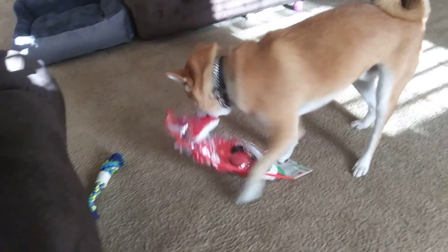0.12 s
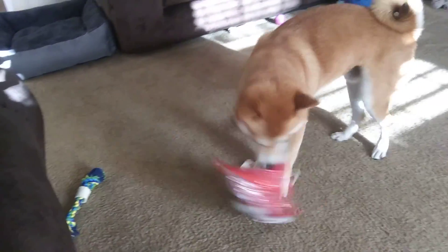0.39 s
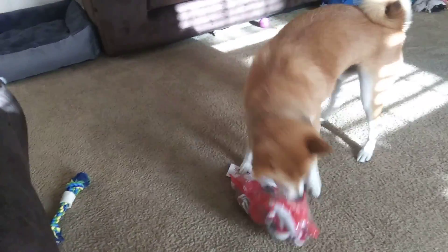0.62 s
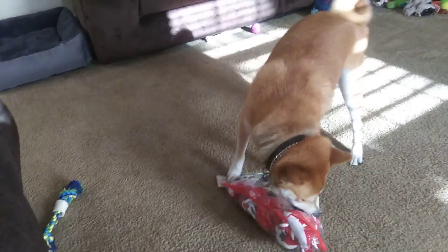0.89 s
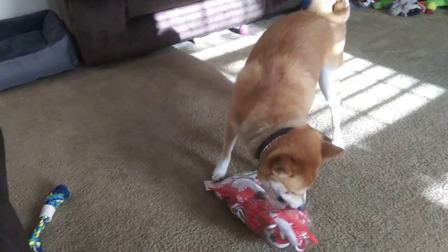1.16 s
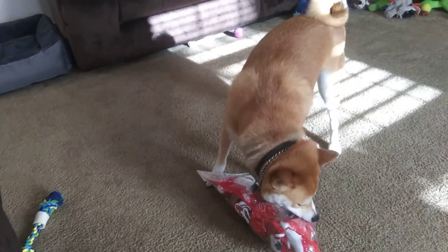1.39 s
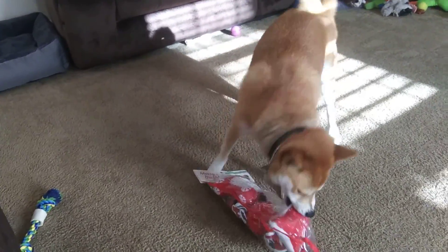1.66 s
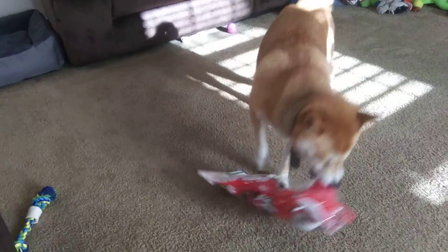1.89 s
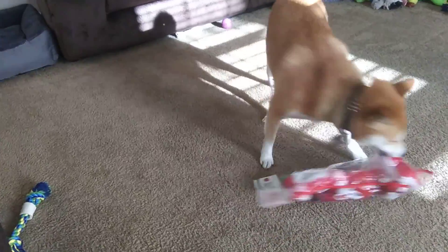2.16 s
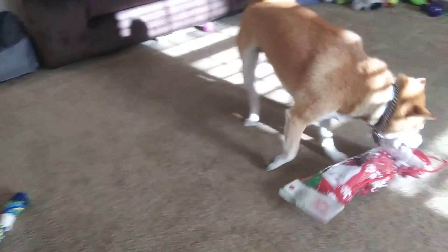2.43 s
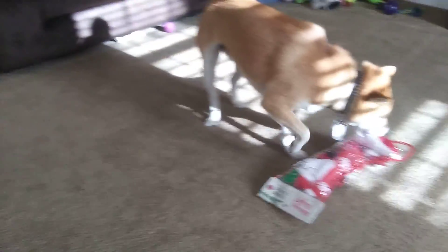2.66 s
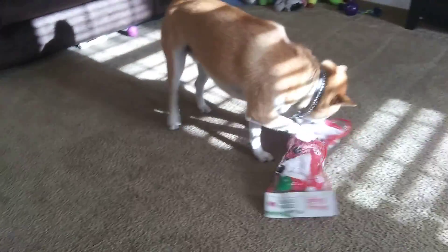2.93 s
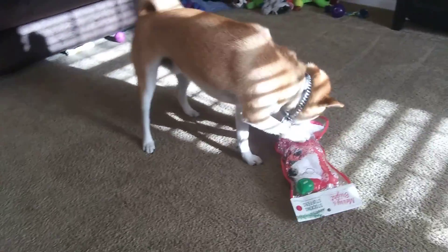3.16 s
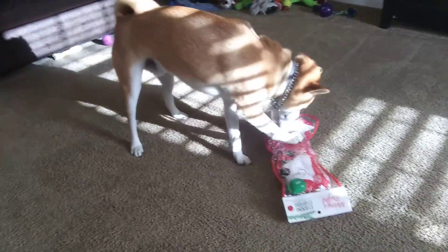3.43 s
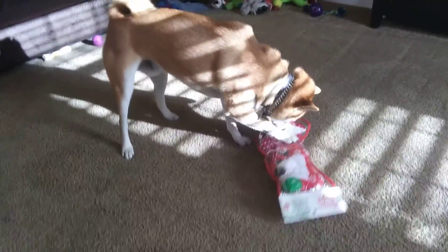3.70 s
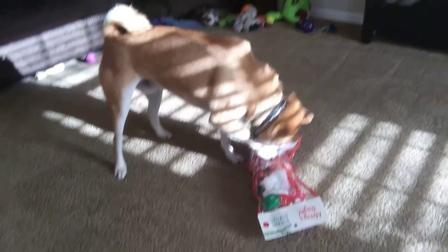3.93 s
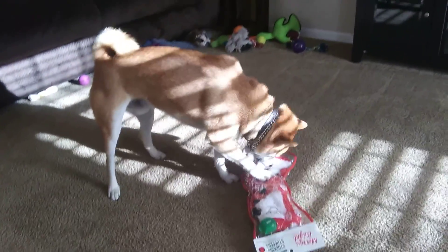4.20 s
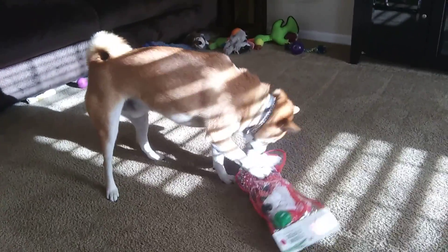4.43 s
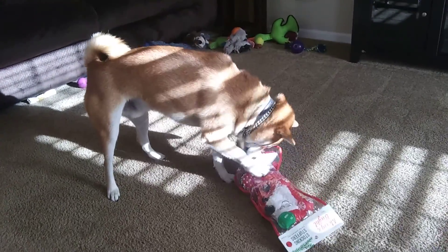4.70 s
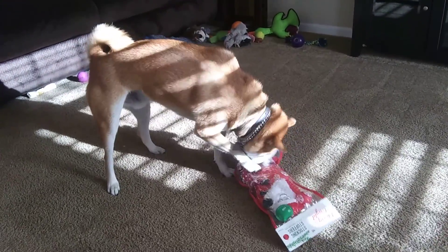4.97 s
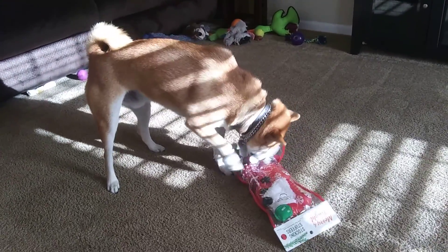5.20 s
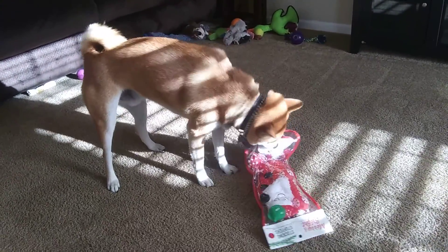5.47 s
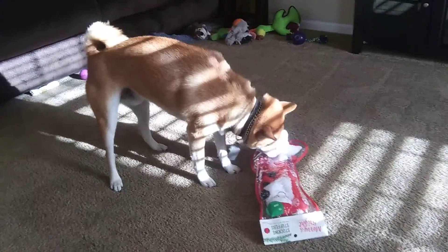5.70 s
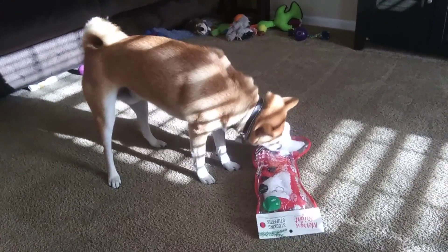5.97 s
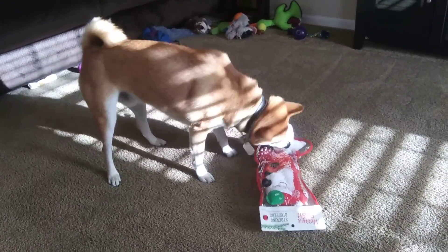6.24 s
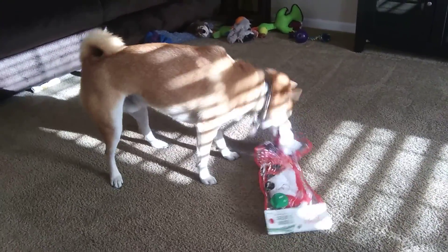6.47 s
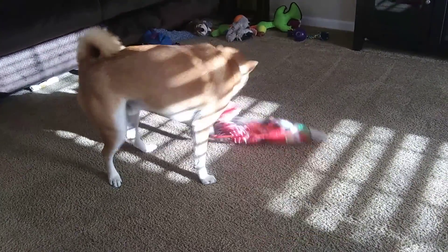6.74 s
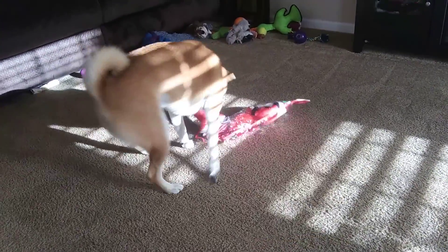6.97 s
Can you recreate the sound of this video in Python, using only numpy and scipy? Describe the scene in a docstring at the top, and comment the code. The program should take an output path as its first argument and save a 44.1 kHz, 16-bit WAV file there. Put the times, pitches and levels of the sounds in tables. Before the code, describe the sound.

In a small furnished room, a few steps from the microphone, a dog bites and drags a foil bag over carpet. Dense crinkling and sharp snaps come first, then light metal collar tags jingle. Further tugs crackle, a toy inside gives one short squeak midway, and rustling grows sparse and faint. Near the end come quick claw scrapes, another rustle and bright jingling over faint hiss.

```python
"""A dog bites and drags a foil gift bag over a carpet, a few steps from the microphone, in a small furnished room.
From the start the foil rustles with each tug and its folds snap: bursts of filtered noise. Soon two metal tags on
the collar jingle: decaying sines restarted at each contact. A claw scrapes the foil near 1.9 s, a toy inside
squeaks once near 3.7 s on a stack of harmonics, and more scrapes come near 6.4 s. Noise tails give the room's
answer, and a faint steady noise of room and microphone lies underneath."""
import sys
import numpy as np
from scipy import signal
from scipy.fft import rfft, irfft
from scipy.io import wavfile
from scipy.ndimage import uniform_filter1d, map_coordinates

SR = 44100
rng = np.random.default_rng(int(sys.argv[2]) if len(sys.argv) > 2 else 0)


def how_loud(loudness_db):
    """Turn decibels into a plain amplitude multiplier (0 dB gives 1, 20 dB gives 10)."""
    steps = np.asarray(loudness_db, float) / 20
    return 10 ** steps


def digitize_waveform(pressure):
    """Quantize a signal to 16-bit integers and store it at the path in sys.argv[1].

    Rows of a 2-D input are taken as channels; values are limited to [-1, 1].
    """
    field = np.atleast_2d(pressure).T
    bounded = np.clip(field, -1, 1)
    quanta = np.round(bounded * 32767).astype(np.int16)
    wavfile.write(sys.argv[1], SR, quanta)


N = 313551
TIME = np.arange(N) / SR

# Spectrum of the air inside the bag: (frequency [Hz], level [dB])
HOLLOW = [(60, -72), (150, -34), (260, -12), (500, -9), (760, -1.5), (1100, -5.5), (1500, -9.5),
          (3000, -43.5)]
# Spectrum of the buckling foil panels: (frequency [Hz], level [dB])
CRINKLE = [(300, -64), (800, -25.5), (1200, -5.5), (1500, -4.5), (1950, -0.5), (2600, -5), (3400, -11),
           (5500, -14.5), (9000, -62.5)]
# Spectrum of the sharp creases: (frequency [Hz], level [dB])
CRACKLE = [(800, -55), (2400, -33.5), (3800, -2), (5500, 3), (8000, -3.5), (10500, -9.5), (13000, -17),
           (16000, -28)]


def unit(x):
    """Scale to rms 1."""
    return x / np.sqrt(np.mean(x ** 2) + 1e-20)


def along(points, hz):
    """Read (frequency [Hz], value) points on a log frequency axis."""
    f, v = np.transpose(points)
    return np.interp(np.log(hz + 1), np.log(f + 1), v)


def wobble(rate):
    """Draw a smooth random curve with rate knots a second."""
    return map_coordinates(rng.standard_normal(N // 64), [TIME * rate])


def coloured(x, spectrum):
    """Filter x causally (minimum phase) to this spectrum, keeping the rms of white noise."""
    cepstrum = irfft(np.log(how_loud(along(spectrum, np.fft.rfftfreq(4096, 1 / SR)))))
    # Folding the cepstrum onto positive times makes the filter causal
    cepstrum[1:2048] *= 2
    cepstrum[2049:] = 0
    response = irfft(np.exp(rfft(cepstrum)))
    return signal.fftconvolve(x, response / np.linalg.norm(response))[:N]


def fading(x, t60):
    """Turn every impulse in x into an envelope that sinks 60 dB in t60 seconds."""
    return signal.lfilter([1], [1, -how_loud(-60 / (t60 * SR))], x)


def creases(rate, spread_db, clump):
    """Moments when a crease gives way: clumped in time, a few much larger than the rest."""
    chance, size = rng.random((2, N))
    happens = chance < rate / SR * np.exp(clump * wobble(35))
    return happens * how_loud(-spread_db * np.log(size + 0.003))


def effort():
    """Gain of each part of the bag: every tug swells and sinks, and the tugs add up in power."""
    # Bites and tugs: (time of most effort [s], time to swell by 20 dB [s], time to sink by 20 dB [s],
    # effort [dB], brightness [dB])
    tugs = [(.03, .2, .3, -54, -1), (.15, .1, .1, -53, .1), (.25, .075, .12, -40, 1),
            (.31, .1, .1, -46, -4), (.39, .25, .16, -39, 3), (.5, .2, .3, -47, 2), (.63, .2, .3, -48, 1),
            (.722, .2, .055, -44, 5), (.874, .03, .12, -50, -3), (1.023, .03, .2, -53, 6),
            (1.247, .05, .03, -50, .1), (1.348, .07, .1, -43, -4), (1.4, .05, .1, -50, 5),
            (1.772, .07, .08, -48, -1), (1.947, .025, .05, -51, -1), (2.05, .15, .15, -64, -4),
            (2.245, .06, .14, -44, 1), (2.32, .05, .15, -47, 1.5), (2.44, .3, .04, -46, 9),
            (2.55, .15, .1, -62, -3), (2.769, .02, .4, -55, -5), (2.893, .2, .2, -52, -2),
            (3.1, .03, .1, -65, -6), (3.22, .2, .2, -68, .1), (3.319, .04, .08, -49, 1),
            (3.392, .07, .04, -44, 7), (3.465, .03, .04, -49, 5), (3.6, .5, .06, -57, -3),
            (3.77, .05, .3, -48, -1), (3.99, .25, .05, -60, -10), (4.215, .025, .3, -56, -4),
            (4.3, .1, .2, -63, 3), (4.465, .1, .04, -57, -1), (4.789, .025, .12, -58, 7),
            (4.914, .08, .06, -61, 9), (5.014, .04, .06, -58, -8), (5.115, .025, .17, -55, 6),
            (5.28, .2, .15, -70, -5), (5.38, .07, .035, -59, -2), (5.588, .025, .04, -55, .1),
            (6.21, .025, .06, -59, -2), (6.43, .09, .3, -66, -11), (6.535, .025, .3, -50, 2),
            (6.7, .12, .15, -48, 3), (6.745, .08, .04, -44, -8), (6.909, .3, .3, -54, 2)]
    # Faint rustle between tugs: (time [s], level [dB])
    nosing = [(0, -70), (2.7, -76), (4.6, -72), (5.5, -80), (7.11, -84)]
    # Hollow, crinkle, crackle: (level [dB], slope with brightness [dB/dB], slope with effort [dB/dB])
    parts = [(.1, -.9, 1), (.1, .01, 1), (-7, .5, 1.35)]
    usual_tug_db = -52  # effort is counted from here
    nosing_bright_db = -5
    t = TIME[::64]
    s, swell, sink, db, bright_db = np.transpose(tugs)[:, :, None]
    slope_db = 20 * np.where(t < s, (s - t) / swell, (t - s) / sink)
    nosing_db = np.interp(t, *np.transpose(nosing))
    gains = []
    for part_db, per_bright, per_effort in parts:
        peak_db = usual_tug_db + per_effort * (db - usual_tug_db) + per_bright * bright_db
        tug_power = np.sum(how_loud(peak_db - slope_db) ** 2, axis=0)
        nosing_power = how_loud(nosing_db + per_bright * nosing_bright_db) ** 2
        gains.append(how_loud(part_db) * np.interp(TIME, t, np.sqrt(tug_power + nosing_power)))
    return gains


def patchy(depth_db):
    """Noise whose colour changes every few ms, as each crease has its own size."""
    z = signal.stft(rng.standard_normal(N), nperseg=256)[2]
    field = uniform_filter1d(rng.standard_normal(z.shape), size=4, axis=0)  # smooth over frequency
    field = uniform_filter1d(field, size=2, axis=1)  # smooth over time
    return unit(signal.istft(z * how_loud(depth_db * unit(field)), nperseg=256)[1][:N])


def rustle():
    """Each crease is a burst of a few ms; many shake all three parts of the bag, others only one."""
    shared = creases(330, 4.7, 0.8)
    # (spectrum, burst t60 [s], steady rubbing beside bursts of rms 1)
    parts = [(HOLLOW, 0.024, 0.6), (CRINKLE, 0.011, 0.35), (CRACKLE, 0.004, 0.28)]
    out = 0
    for (spectrum, t60, rub), gain in zip(parts, effort()):
        own = creases(420, 4.8, 0.9)
        bursts = unit(fading(shared + 0.74 * own, t60)) + rub
        # The pull on the bag sets the energy spent: level the bursts over 50 ms, then apply the gain
        pull = np.sqrt(np.abs(uniform_filter1d(bursts ** 2, size=SR // 20)))
        out = out + gain * coloured(bursts / pull * patchy(3.43), spectrum)
    return out


def snaps():
    """A big fold cracks and dies, its hollow part last; a claw scrape swells and fades."""
    # Single loud folds: (time [s], crinkle peak [dB], hollow re crinkle [dB], crackle re crinkle [dB])
    folds = [(.0558, -37, -13, 3.5), (.128, -42, -3, -4), (.143, -39, -2, -10), (.177, -34, -2, -2),
             (.2145, -35, -8, -9), (.2274, -28, -10, -8), (.2416, -29, -6, 3), (.278, -29, -8, -8),
             (.329, -28, -4, -3), (.3446, -27, 1, -12), (.3727, -22, -4, -9), (.3789, -22, -8, -3),
             (.4064, -30, -25, -10), (.482, -34, -8, -12), (.507, -32, -7, 1), (.545, -37, -3, -4),
             (.602, -35, -1, -8), (.6572, -31, -7, -6), (.694, -30, -20, -4), (.8653, -31, -10, -18),
             (1.2227, -36.5, -13, -14), (1.296, -39, -3, -5), (1.3227, -32.5, -1.5, .1),
             (1.7656, -34, .1, -5), (2.065, -48, -2, -20), (2.2019, -38, -19, -13), (2.2329, -29, -11, -9),
             (2.2506, -26, -15, -16), (2.2648, -30.5, -10, -14), (2.2822, -20.5, -18, -10),
             (2.388, -29.5, -30, -11), (2.569, -41.5, -11, -2), (2.64, -50, -4, -8),
             (2.8861, -33.5, -1, -10), (2.9786, -41, -12, 4), (3.062, -48, -11, -25), (3.1006, -52, 7, -20),
             (3.3097, -28, -5.5, 1), (3.459, -31.5, -23, -11), (3.5237, -39.5, -21, -1),
             (3.697, -48, -10, 1), (3.751, -39, -5, -5), (3.7625, -37, -8, -5), (4.2138, -42, -1, -25),
             (4.422, -42, 1, -10), (4.8285, -43, -9.5, -21), (4.899, -43, -12, .5), (5.1018, -41.5, -27, 2),
             (5.1302, -46, -14, -2), (6.5323, -32, -8, -10), (6.672, -44, -10, 8), (6.82, -42, -1, -12),
             (6.836, -41, -1, -12), (6.876, -46, -10, 6), (6.892, -34, -15, -20)]
    # A claw skips over the foil: (time [s], level [dB])
    scrapes = [(1.935, -48), (6.374, -35), (6.398, -36), (6.421, -33.5), (6.443, -35), (6.465, -33.5)]
    # Spectrum of a claw on tight foil: (frequency [Hz], level [dB])
    claw = [(300, -60), (1100, -18), (1700, .5), (2600, 1), (6000, -9.5), (12000, -28)]
    scrape_s = 0.0095
    t = np.arange(SR // 16) / SR
    drive = np.zeros((4, N + len(t)))  # hollow, crinkle, crackle, claw
    decay_s = np.array([[0.006], [0.004], [0.0025]])
    crack = (1 - np.exp(-t / 0.00045)) * np.exp(-(t / decay_s) ** 1.5)
    for s, db, hollow_db, crackle_db in folds:
        rms_db = db - 3.0  # a noisy burst peaks above its rms
        part_db = rms_db + np.array([[hollow_db], [0], [crackle_db]])
        drive[:3, round(s * SR):][:, :len(t)] += how_loud(part_db) * crack
    scrape = np.sin(np.pi * np.clip(t / scrape_s, 0, 1) ** 0.55)
    for s, db in scrapes:
        drive[3, round(s * SR):][:len(t)] += how_loud(db) * scrape
    drive = drive[:, :N] * rng.standard_normal((4, N))
    return sum(coloured(d, spectrum) for d, spectrum in zip(drive, (HOLLOW, CRINKLE, CRACKLE, claw)))


def tag(families, hits, flutter_db, tick_db, links_db, rattle_db):
    """A contact stops the old ring and starts a new one; the swinging tag flutters and the collar links rattle."""
    hits = np.array(hits)
    last = np.clip(np.searchsorted(hits[:, 0], TIME) - 1, 0, None)  # latest contact at each sample
    age = TIME - hits[last, 0]

    def ring(hz, db, t60):
        """One mode, restarted at every contact; no two contacts land alike."""
        luck = rng.standard_normal((len(hits), 2))[last]
        # The first moments lose most, while the tags still touch
        bite_db = 3.0 * np.exp(-np.abs(age) / 0.014)
        swing_db = flutter_db * (0.3 * wobble(50) + 0.95 * wobble(140))
        level_db = db + 1.2 * luck[:, 0] + bite_db - 60 * np.abs(age) / t60 + swing_db
        level = uniform_filter1d(how_loud(level_db) * (age > 0), size=12)
        phase = 2 * np.pi * hz * age + 9 * luck[:, 1] + 0.7 * wobble(120)
        return level * np.sin(phase)

    out = np.zeros(N)
    for k, modes in enumerate(families):
        for hz, db, t60 in modes:
            out = out + ring(hz, hits[last, 1 + k] + db, t60)
    force_db = hits[:, 1:].max(axis=1)
    link_hz = rng.uniform(4000, 16000, size=(len(hits), 5))  # each jolt finds other links of the collar
    for hz in link_hz.T:
        out = out + ring(hz[last], force_db[last] + links_db, 0.04)
    # Small tags give no bass
    out = signal.sosfilt(signal.butter(2, 2500, 'high', fs=SR, output='sos'), out)

    strikes = np.zeros(N)
    strikes[np.round(hits[:, 0] * SR).astype(int)] = how_loud(force_db)
    tick = fading(strikes, 0.0023)
    rattle = fading(strikes, 0.23) * unit(fading(creases(280, 2.3, 0.6), 0.01))
    clatter = (how_loud(tick_db) * tick + how_loud(rattle_db) * rattle) * rng.standard_normal(N)
    return out + coloured(clatter, [(2500, -53), (4500, 8.5), (10000, 3.5), (16000, -5)])


def jingle():
    """Two metal tags ring in families of modes; where a contact lands sets the drive of each family."""
    # Modes of each tag, grouped in families: (frequency [Hz], level [dB], t60 [s])
    round_tag = [
        [(4900, -2, .22), (4945, -4, .22), (7870, -13, .15)],
        [(6700, 1, .18), (6660, -4, .18)],
        [(10440, 0, .25), (10400, -5, .25), (11280, -14, .2)],
        [(13765, -1, .3), (15712, -1, .22)],
    ]
    small_tag = [
        [(5675, 1, .15), (8785, -5, .15), (12400, -5, .15)],
        [(10820, 0, .15), (10700, -5, .12)],
        [(14190, -2, .14), (14375, 0, .14), (15170, 1, .15)],
    ]
    # Contacts of the round tag: (time [s], level of family 0, 1, 2, 3 [dB])
    round_hits = [(.285, -80, -80, -66, -55), (.455, -51, -40, -42, -69), (.493, -50, -69, -57, -61),
                  (.622, -60, -52, -50, -74), (.638, -53, -40, -55, -69), (.676, -49, -63, -71, -80),
                  (.702, -62, -80, -54, -67), (.858, -64, -66, -57, -62), (.942, -36.5, -45, -53, -49),
                  (.958, -39.5, -50, -49, -50), (.987, -49, -48, -61, -63), (1.017, -56, -55, -55, -64),
                  (1.06, -56.5, -58, -51, -75), (1.125, -51, -75, -47, -45), (1.151, -53, -54, -55, -51),
                  (1.185, -44, -59, -54, -63), (1.216, -46, -52, -53, -64), (1.37, -38, -39.5, -46, -61),
                  (1.398, -46, -47, -47, -57), (1.434, -49, -64, -58, -63), (1.453, -52, -50.5, -64, -67),
                  (1.645, -62, -62, -66, -80), (1.667, -54, -54, -64, -66), (2.31, -51, -63, -55, -80),
                  (2.329, -53, -57, -60, -80), (2.417, -50, -56, -55, -80), (2.428, -46, -54, -57, -70),
                  (2.497, -60, -64, -62, -75), (2.577, -59, -63, -63, -80), (2.94, -46.5, -46.5, -45, -58),
                  (3.278, -59, -80, -66, -80), (3.333, -64, -80, -55, -67), (3.473, -80, -80, -63, -80),
                  (3.584, -62, -72, -57, -80), (3.859, -48, -58, -74, -80), (4.288, -51, -62, -61, -66),
                  (4.45, -70, -80, -67, -80), (4.785, -55, -52.5, -68, -80), (4.942, -52, -64, -55, -80),
                  (5.73, -72, -74, -70, -80), (5.82, -67, -74, -72, -80), (5.883, -50, -53, -59, -80),
                  (5.919, -57, -69, -66, -80), (5.965, -51, -61, -50, -62), (5.993, -54, -59, -64, -60),
                  (6.03, -55, -72, -59, -80), (6.178, -59, -67, -71, -80), (6.21, -57.5, -57, -63, -80),
                  (6.271, -58, -70, -66, -62), (6.346, -60, -59, -56, -62), (6.355, -48, -51, -52, -64),
                  (6.372, -45, -43, -56, -71), (6.4, -46, -52, -53, -68), (6.476, -48, -68, -55, -80),
                  (6.61, -49, -80, -50, -56), (6.635, -47, -64, -52, -68), (6.672, -57, -55, -53, -80),
                  (6.713, -37, -38, -37, -50), (6.74, -43.5, -53, -47, -59), (6.765, -49, -54, -54, -63),
                  (6.864, -55, -50.5, -54, -48), (6.89, -57, -48, -46, -63), (6.907, -48, -51, -46.5, -59),
                  (6.951, -46, -56.5, -50, -59), (7.051, -55, -61, -52.5, -59)]
    # Contacts of the small tag: (time [s], level of family 0, 1, 2 [dB])
    small_hits = [(.493, -80, -54, -62), (.523, -56, -66, -60), (.769, -54, -55, -80),
                  (.858, -68, -80, -60), (.935, -43, -49, -47), (.95, -46, -42, -80), (.987, -58, -48, -46),
                  (1.06, -58, -55, -80), (1.077, -53, -52, -55), (1.088, -54, -41, -66),
                  (1.117, -50, -46, -51), (1.127, -45, -41, -49), (1.151, -51, -44.5, -72),
                  (1.185, -53, -61, -62), (2.352, -56, -67, -80), (2.94, -80, -63, -56),
                  (6.271, -68, -70, -57), (6.627, -59, -63, -57), (6.713, -60, -41, -49),
                  (6.864, -54, -52, -50), (6.89, -51, -44.5, -55), (6.914, -48, -51, -61)]
    large = tag(round_tag, round_hits, flutter_db=2.6, tick_db=5, links_db=-17, rattle_db=-9)
    small = tag(small_tag, small_hits, flutter_db=3, tick_db=5, links_db=-14, rattle_db=-8)
    return large + small


def squeaker():
    """Air forced past the toy's reed: a clean stack of overtones, the even ones growing with pitch."""
    # Course of the squeak: (time [s], reed pitch [Hz], level [dB], gain of overtones above the 4th [dB])
    squeak = [(3.672, 1112, -56, -12), (3.678, 1152, -46.5, 3), (3.702, 1160, -43.5, 1),
              (3.74, 1182, -45, -2), (3.765, 1207, -45.5, -2), (3.788, 1180, -49, 4),
              (3.81, 1135, -47.5, 5), (3.845, 1100, -56, -24)]
    # Overtones of the reed: (multiple of the pitch, level [dB])
    reed = [(1, -0.5), (2, -5.5), (3, -13.5), (4, -8), (5, -8.5), (6, -16.5), (7, -23), (8, -15), (9, -17)]
    even_from_hz, even_db_per_hz = 1172, 0.22  # a harder squeeze raises the pitch and the even overtones
    s, *columns = np.transpose(squeak)
    hz, db, upper_db = [np.interp(TIME, s, column) for column in columns]
    even_db = even_db_per_hz * np.clip(hz - even_from_hz, -20, None)
    phase = 2 * np.pi * np.cumsum(hz * (1 + 0.003 * wobble(120))) / SR
    stack = 0
    for k, level_db in reed:
        overtone_db = level_db + even_db * (k % 2 == 0) + upper_db * (k > 4) + 2.1 * wobble(90)
        stack = stack + how_loud(overtone_db) * np.sin(k * phase)
    gate = (TIME > s[0]) & (TIME < s[-1])
    return np.sqrt(2) * how_loud(db) * uniform_filter1d(1. * gate, size=200) * stack


def room(x):
    """Each frequency of the room's answer dies at its own speed, in a noise tail starting 200 samples late."""
    # Reverberation: (frequency [Hz], t60 [s])
    decay = [(200, 0.35), (2000, 0.21), (10000, 0.057)]
    hz, t, z = signal.stft(rng.standard_normal(SR // 2), SR, nperseg=256)
    tail = signal.istft(z * how_loud(-60 * t / along(decay, hz)[:, None]), SR, nperseg=256)[1]
    return signal.fftconvolve(np.pad(x, (200, 0)), tail / np.linalg.norm(tail))[:N]


def hush():
    """Room tone and microphone hiss: steady coloured noise at -67 dB rms."""
    # Spectrum of the hush: (frequency [Hz], level [dB])
    spectrum = [(20, -24), (100, -23), (300, -3.5), (700, 1.5), (2000, -3), (4500, -9), (9000, -13),
                (15900, -14.5), (16500, -42)]
    return how_loud(-67) * coloured(rng.standard_normal(N), spectrum)


def scene():
    """Bag, tags and toy in the room, over the room tone."""
    bag = rustle() + snaps()
    tags_and_toy = jingle() + squeaker()
    answer = how_loud(-13) * room(bag) + how_loud(-10.5) * room(tags_and_toy)
    return (bag + tags_and_toy + answer + hush())[None]


def low_pass(x):
    """Removes everything above the highest recorded frequency."""
    return signal.sosfilt(signal.butter(12, 16830, fs=SR, output="sos"), x)


def record(dry):
    """The phone stores the finished mix."""
    return low_pass(dry)


dry = scene()
out = record(dry)
digitize_waveform(out)
```